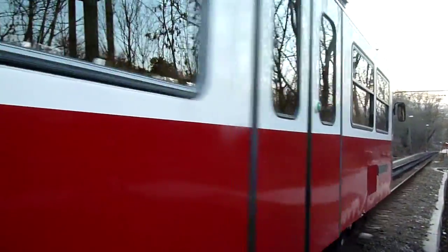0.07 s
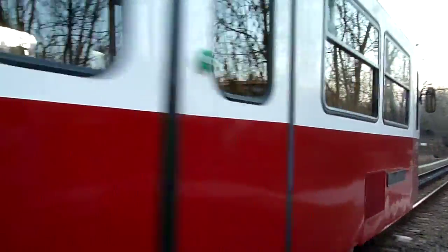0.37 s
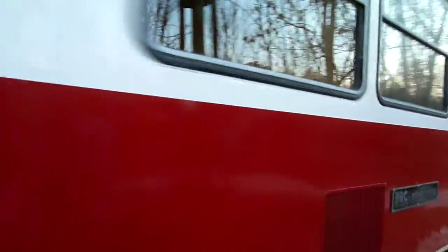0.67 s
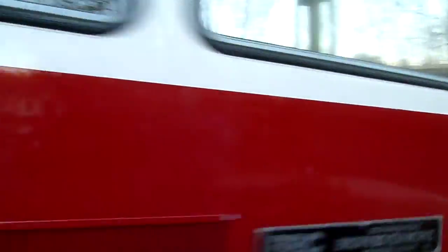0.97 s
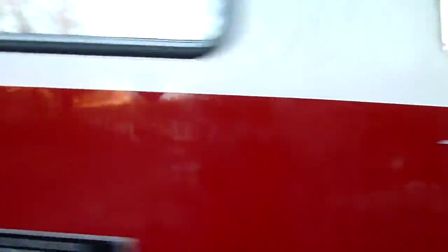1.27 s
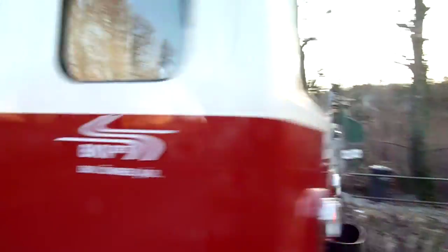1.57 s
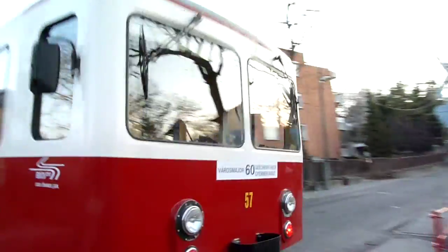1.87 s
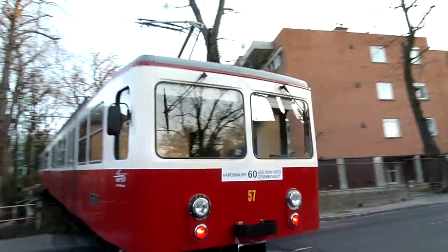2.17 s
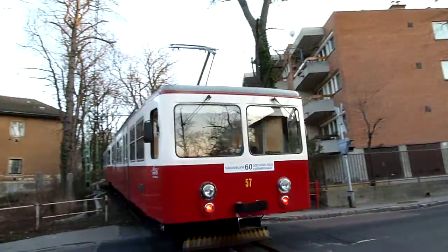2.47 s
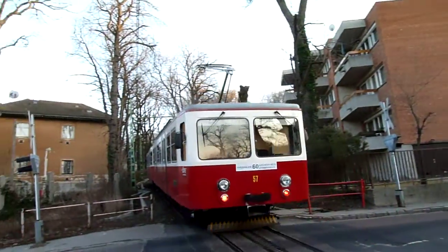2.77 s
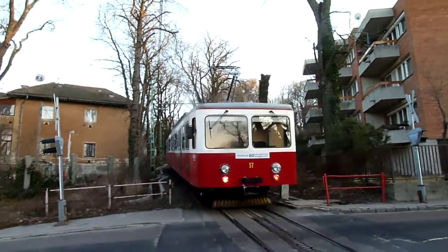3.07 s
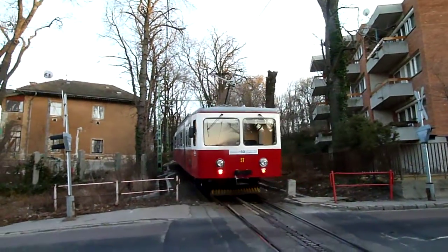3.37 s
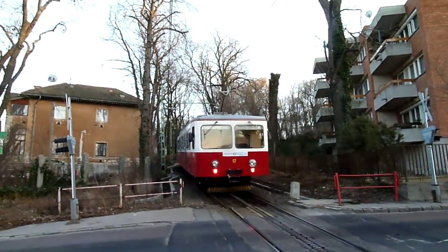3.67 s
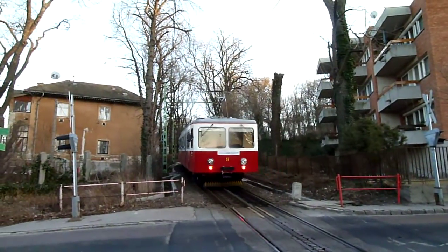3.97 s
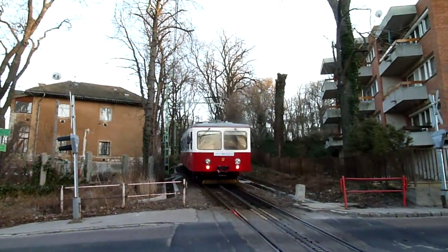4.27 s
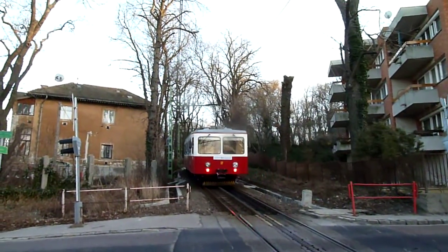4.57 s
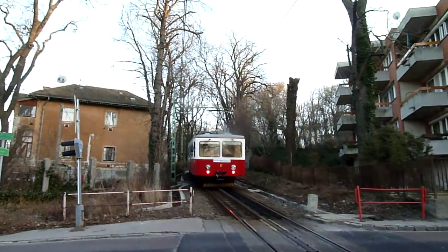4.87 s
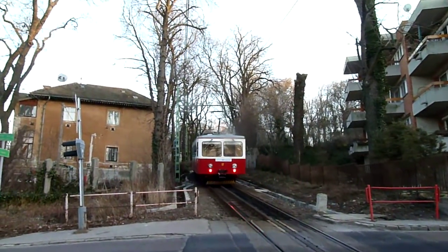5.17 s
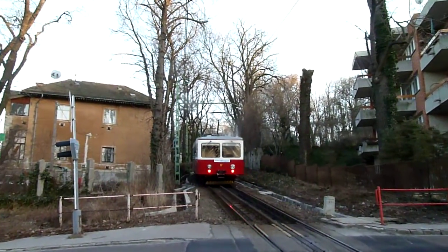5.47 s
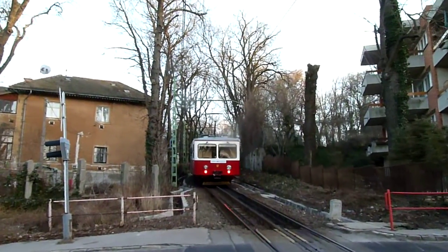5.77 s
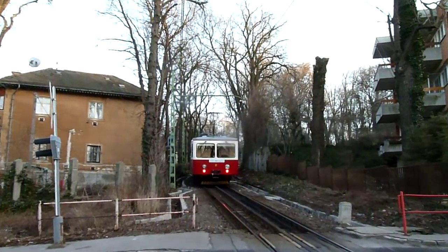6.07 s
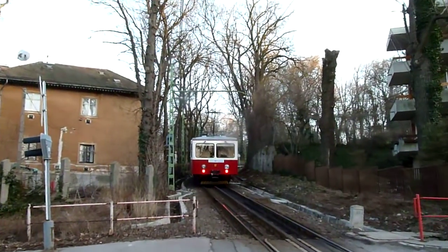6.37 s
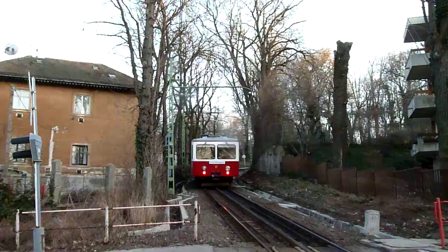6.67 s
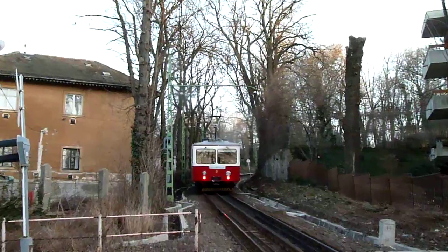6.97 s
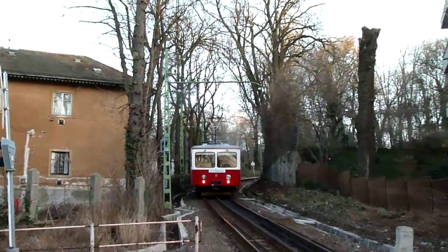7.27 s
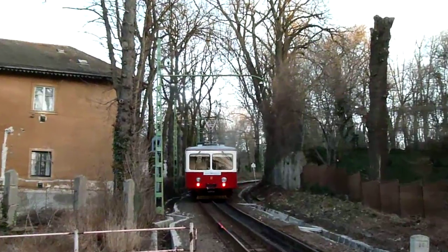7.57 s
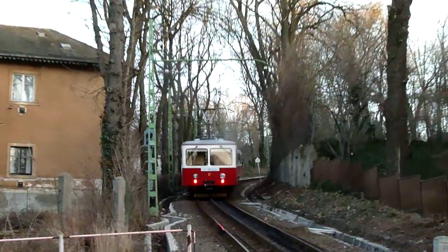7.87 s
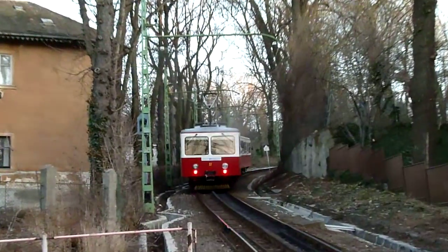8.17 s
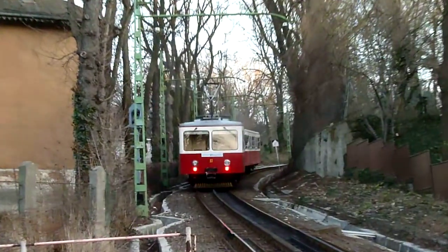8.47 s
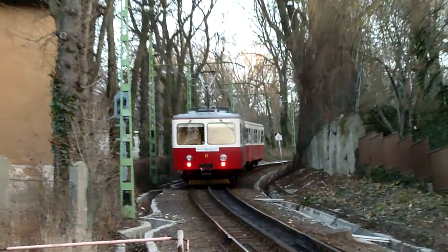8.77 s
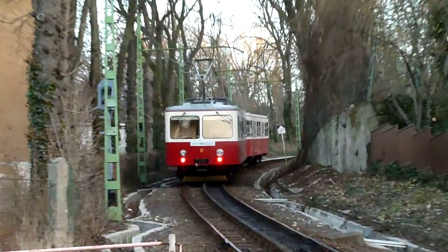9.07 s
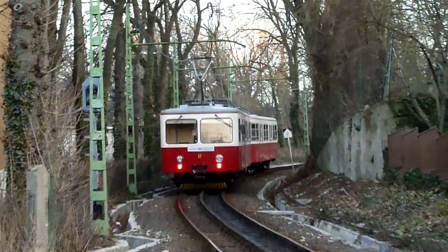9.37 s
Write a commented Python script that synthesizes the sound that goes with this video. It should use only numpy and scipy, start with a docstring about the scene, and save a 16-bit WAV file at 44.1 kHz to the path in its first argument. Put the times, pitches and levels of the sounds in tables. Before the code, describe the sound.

A cog railway car rolls past very close with a roar, steel squeals and knocks, then draws away with a throbbing drone.

```python
"""A broad roar, with steel hissing, squealing and knocking in it: a cog railway car rolls past within
arm's reach, crosses a road and draws away, slowly gaining speed. Friction rings the modes of its wheels,
and blows at the joints ring those of the running gear. The pinions strike the rack periodically and so
sound a harmonic series; further off its third harmonic, lifted by a resonance of the car body, stands
out as a drone."""
import sys
import numpy as np
from scipy import signal
from scipy.fft import rfft, irfft
from scipy.io import wavfile
from scipy.ndimage import uniform_filter1d

SR = 44100
rng = np.random.default_rng(int(sys.argv[2]) if len(sys.argv) > 2 else 0)


def to_wav(sig):
    """Store sig (one row per channel, or 1-D mono) as 16-bit WAV at the path in sys.argv[1].

    Samples outside -1..1 are clipped; the rate is SR.
    """
    pcm = np.clip(np.atleast_2d(sig), -1, 1) * 32767
    pcm = np.round(pcm).astype(np.int16)
    wavfile.write(sys.argv[1], SR, pcm.T)  # frames by channels


N = 420273
T = np.arange(N) / SR

# The rolling level, reference for roar and friction. Each row: time in seconds, level in dB.
ROLLING_LEVEL = [(0.0, -33), (2.02, -34.5), (3.15, -40.5), (3.79, -39), (3.92, -43), (4.91, -41),
                 (6.4, -42.5), (7.45, -36), (7.65, -40), (7.85, -37), (9.53, -36.5)]
# Spectrum of steel rubbing on steel. Each row: frequency in Hz, relative density in dB.
FRICTION_SPECTRUM = [(600, -7.5), (1500, 7), (2600, 5.5), (4000, 4), (5300, -2.5), (6200, -8),
                     (7100, -25.5)]


def amp(db):
    """Amplitude ratio for a level in decibels."""
    return 10 ** (np.asarray(db) / 20)


def unit(x):
    """Normalisation to rms 1."""
    return x / np.sqrt(np.mean(x ** 2) + 1e-20)


def curve(rows):
    """Linear interpolation between rows of time in seconds and value."""
    return np.interp(T, *np.transpose(rows))


def swell(s, length):
    """A raised-cosine window of height 1, centred on time s."""
    return np.cos(np.pi * np.clip((T - s) / length, -.5, .5)) ** 2


def plateau(s, length):
    """A rounded, flat-topped window of height 1, centred on time s."""
    return np.maximum(1 - np.abs(2 * (T - s) / length) ** 3, 0)


def add(mix, s, sound):
    """Superposition: a sound joins the mix at time s."""
    part = mix[max(round(s * SR), 0):][:len(sound)]
    part += sound[:len(part)]


def wander(rate_hz):
    """Low-pass noise of rms 1: a random fluctuation up to about the given rate."""
    knots = rng.standard_normal(2048)
    slow = irfft(rfft(knots) / (1 + (np.fft.rfftfreq(2048, 1 / 200) / rate_hz) ** 4))
    return unit(np.interp(T, np.arange(2048) / 200, slow))


def noise(shape, patchy_db):
    """Spectrally shaped noise of rms 1, with short-lived patches of more and less energy."""
    hz = np.fft.rfftfreq(2048, 1 / SR)
    re, im, patches = rng.standard_normal((3, len(hz), N // 512 + 4))
    patches = unit(uniform_filter1d(uniform_filter1d(patches, size=14, axis=0), size=4, axis=1))
    shape_hz, db = np.transpose(shape)
    colour = amp(np.interp(np.log(hz + 1), np.log(shape_hz), db))[:, None]
    spectra = (re + 1j * im) * colour * amp(patchy_db * patches)
    return unit(signal.istft(spectra, nperseg=2048, noverlap=1536)[1][:N])


def band(x, low_hz, high_hz):
    """A steep band-pass filter."""
    return signal.sosfilt(signal.butter(3, [low_hz, high_hz], "band", fs=SR, output="sos"), x)


def resonate(x, hz, width):
    """Forced response of a damped oscillator of fixed or gliding frequency; width is in Hz."""
    phasor = np.exp(2j * np.pi * np.cumsum(hz * np.ones(len(x))) / SR)
    pole = np.exp(-np.pi * width / SR)
    return 2 * (phasor * signal.lfilter([1 - pole], [1, -pole], x / phasor + 1e-18)).imag


def ring(x, hz, width):
    """Two resonators in cascade give a peak with steep skirts; rms 1."""
    return unit(resonate(resonate(x, hz, 1.2 * width), hz, 1.4 * width))


def held(x):
    """Amplitude limiting: evens out the fading of a mode, as steady friction does."""
    return x / np.sqrt(uniform_filter1d(x ** 2, size=SR // 40) + .1)


def dulled(x, away):
    """Absorption over distance takes off some of the top treble."""
    return x + 0.22 * away * (uniform_filter1d(x, size=5) - x)


def wheel_mode(hz, width):
    """A noise-driven mode, Doppler-shifted upward until the wheels have gone by."""
    pass_s, pass_length_s, shift = 1.3, .12, .015
    doppler = 1 + shift * (1 - np.tanh((T - pass_s) / pass_length_s)) / 2
    return ring(rng.standard_normal(N), hz * doppler, width)


def mesh_cycles():
    """Phase is the integral of frequency: the count of teeth passed, as the drive hunts a little."""
    # Each row: time in seconds, teeth meeting the rack per second.
    tooth_rate = [(0, 55.0), (2, 57.5), (3, 59.6), (4, 61.0), (5, 62.2), (7.5, 64.1), (9.53, 64.3)]
    return np.cumsum(curve(tooth_rate) * (1 + 0.0053 * wander(rate_hz=3.18))) / SR


def tooth_pulse(cycles):
    """Amplitude modulation by the load: one swell a tooth, no two equally hard; rms 1."""
    return unit((.35 + np.cos(np.pi * cycles) ** 2) * amp(.8 * wander(rate_hz=40)))


def scraping():
    """Friction grows with contact force: its rise in dB while a bogie leans on the rail."""
    # Each row: middle in seconds, length in seconds, rise in dB.
    scrapes = [(0.65, 0.12, 0.5), (2.794, 0.29, 7.5), (3.69, 0.74, 4.5), (4.553, 0.32, 8), (4.94, 0.91, 7),
               (5.404, 0.94, 6), (6.837, .22, 3.5), (7.32, 0.55, 0), (9.1, 1, 4)]
    return sum(db * swell(s, length) for s, length, db in scrapes)


def pinions_in_step():
    """Constructive interference: an envelope that rises where the pinions fall into step."""
    # Each row: middle in seconds, length in seconds.
    swells = [(3.62, 0.3), (4.184, 0.12), (4.405, 0.21), (4.537, 0.18), (4.773, 0.19), (5.19, 0.47),
              (5.718, 0.27), (5.993, 0.27), (6.292, 0.42), (6.62, 0.2), (7.13, 0.39)]
    return sum(plateau(s, length) for s, length in swells)


def rumble(scrape_db, in_step):
    """Forced vibration of car body and track bed, growing with scrapes and heaving with the drone."""
    # Each row: time in seconds, base level in dB.
    body_level = [(0, -34.5), (2.6, -38.5), (3.6, -35.5), (4.7, -34.5), (6.2, -43.5), (7.4, -30.5),
                  (8.5, -39), (9.53, -40)]
    # Each row: frequency in Hz, relative density in dB.
    body_spectrum = [(15, -28.5), (25, -10.5), (38, 8.5), (65, 0.5), (85, 8.5), (130, 4.5), (220, 11),
                     (330, -16.5), (600, -53)]
    level_db = curve(body_level) + 0.22 * scrape_db + 3 * (in_step - .5) + wander(rate_hz=1.9)
    return amp(level_db) * noise(body_spectrum, patchy_db=1.0)


def flange_hiss():
    """Sliding friction: in the bend the flanges lean on the rail and give a coarse band of noise."""
    # Each row: time in seconds, level in dB.
    grinding_level = [(6.6, -64.5), (7.7, -57), (7.95, -45.5), (8.9, -49), (9.53, -50.5)]
    return amp(curve(grinding_level)) * unit(band(rng.standard_normal(N), low_hz=2230, high_hz=3550))


def snap():
    """A short impulse has a wide spectrum: a dry, bright click close by, with one quick rebound."""
    # Each row: start in seconds, peak level in dB.
    clicks = [(3.931, -11)]
    decay_s, rebound_s = 0.00014, 0.0021
    out, t = np.zeros(N), np.arange(SR // 100) / SR
    crack = band(np.exp(-t / decay_s) * np.sin(2 * np.pi * 4200 * t), low_hz=2470, high_hz=7060)
    crack /= np.abs(crack).max()
    for s, db in clicks:
        add(out, s, amp(db) * crack)
        add(out, s + rebound_s, amp(db) * crack)
    return out


def knocks():
    """Impact excitation: a push and a brief rattle set the modes of the bogie ringing in a round clunk."""
    # Each row: start in seconds, nominal level in dB, decay of the rattle in seconds, pitch factor.
    blows = [(0.604, -23, 0.05, 0.83), (0.853, -20.5, 0.015, 0.66), (1.345, -22, 0.016, 0.53),
             (1.598, -12.5, 0.0082, 1.02), (2.312, -12, 0.018, 1.08), (2.338, -20, 0.01, 1.04),
             (3.029, -17.5, 0.0074, 1.06), (4.669, -23, 0.0047, 1.09), (4.985, -17, 0.0029, 1.1)]
    # Each row: frequency in Hz, base bandwidth in Hz, relative level in dB.
    bogie_modes = [(283, 25, -2.5), (382, 37, -0.5), (479, 23, -4), (562, 16, -1), (657, 32, -4),
                   (780, 41, -21), (960, 290, -6.5)]
    out, t = np.zeros(N), np.arange(SR // 4) / SR
    for s, db, decay, pitch in blows:
        drive = rng.standard_normal(len(t)) * np.exp(-t / decay)
        drive[0] += .3 * np.linalg.norm(drive)  # the push
        damping = 1 + 0.0047 / decay  # short blows are the well damped ones
        clunk = sum(amp(mode_db) * unit(resonate(drive, hz * pitch, width * damping))
                    for hz, width, mode_db in bogie_modes)
        clunk = band(clunk, low_hz=250, high_hz=1100) * (1 - np.exp(-t / .002))
        add(out, s, amp(db) * unit(clunk) * np.sqrt(decay / t[-1]))
    return out


def clashes():
    """Hard contact excites high frequencies: flanges and teeth strike steel, and one wheel mode rings."""
    # Each row: start in seconds, level in dB before the envelope, decay in seconds,
    # mode frequency in Hz, mode level in dB relative to the burst.
    strikes = [(0.2, -26, 0.049, 4020, -12), (0.842, -20.5, 0.023, 5110, -15),
               (1.335, -35.5, 0.03, 1884, 11.5), (1.716, -27.5, 0.037, 2344, 4.5),
               (2.326, -27, 0.042, 3540, -5), (2.471, -28.5, 0.015, 3350, -6),
               (3.783, -27, 0.015, 3000, -19), (5.012, -24.5, 0.029, 3490, -4),
               (5.303, -27, 0.024, 3490, -3), (7.474, -35.5, 0.037, 3590, 3),
               (9.133, -23.5, 0.038, 3550, -1.5)]
    out, t = np.zeros(N), np.arange(SR // 3) / SR
    bright = unit(signal.lfilter([1, -.4], 1, noise(FRICTION_SPECTRUM, patchy_db=2)))
    grit = bright * unit(amp(3.2 * wander(rate_hz=70)))
    for s, db, decay, hz, ring_db in strikes:
        envelope = np.exp(-t / decay) * (1 - np.exp(-t / (.7 * decay)))
        burst = grit[round(s * SR):][:len(t)] * envelope
        chime = ring(burst, hz, width=70) * np.std(burst)
        add(out, s, amp(db) * (burst + amp(ring_db) * chime))
    return out


def squeals(scrape_db, away):
    """Stick-slip: two wheel modes sing thinly, flutter as one and flare where a flange catches."""
    # Each row: middle in seconds, length in seconds, levels of the lower and upper mode in dB.
    flares = [(0.358, 0.12, -46, -44.5), (0.82, 0.37, -39.5, -50), (1.11, 0.26, -35.5, -43),
              (1.384, 0.1, -36, -42), (1.535, 0.21, -31.5, -46), (1.85, 0.21, -39.5, -48),
              (2.11, 0.28, -40.5, -41.5), (2.6, 0.77, -49.5, -52), (3.85, 1, -59, -52),
              (5.2, 0.091, -59, -42), (6.8, 0.52, -50, -54), (7.36, 0.54, -45, -48),
              (9.203, 0.25, -37, -48)]
    # Each row: time in seconds, frequency of the upper mode in Hz before the Doppler shift.
    upper_pitch = [(5.3, 3570), (6.7, 3530)]
    # Higher modes, heard close by. Each row: frequency in Hz, level in dB relative to the upper mode.
    overtones = [(4340, -18), (5040, -17), (5440, -17.5)]
    lower_hz, width_hz = 2334, 56
    lower_db, upper_db = -14.5, -19.5  # steady singing, relative to the friction
    low = held(wheel_mode(lower_hz, width_hz))
    high = held(wheel_mode(curve(upper_pitch), width_hz))
    high += (1 - away) * sum(amp(db) * wheel_mode(hz, width_hz) for hz, db in overtones)
    flutter = unit(amp(3 * (wander(rate_hz=45) + .5 * wander(rate_hz=12))))
    low_flare = sum(amp(db) * plateau(s, length) for s, length, db, _ in flares)
    high_flare = sum(amp(db) * plateau(s, length) for s, length, _, db in flares)
    friction = amp(curve(ROLLING_LEVEL) + scrape_db)
    low *= np.hypot(amp(lower_db) * friction, low_flare)
    high *= np.hypot(amp(upper_db) * friction, high_flare)
    return flutter * (low + high)


def wheel_rubbing(scrape_db):
    """Friction is a broadband force: the steel hisses and its damped modes ring, surging in scrapes."""
    # Each row: frequency in Hz, bandwidth in Hz, relative level in dB.
    damped_modes = [(1286, 110, 1), (2545, 270, -1.5), (4890, 200, -12)]
    hiss = noise(FRICTION_SPECTRUM, patchy_db=2.0) * unit(amp(0.79 * wander(rate_hz=57)))
    ringing = sum(amp(db + 2 * wander(rate_hz=17)) * wheel_mode(hz, width)
                  for hz, width, db in damped_modes)
    return amp(curve(ROLLING_LEVEL) - 16.5 + scrape_db) * (amp(8.0) * hiss + ringing)


def groans(cycles):
    """Source and filter: the pinion binds, and its teeth grind and rasp into a gliding resonance."""
    # Each row: start and length in seconds, first and last frequency in Hz, level in dB, bandwidth in Hz.
    glides = [(0.447, 0.35, 517, 725, -27.5, 150), (1.07, 0.42, 400, 300, -25, 150),
              (1.42, 0.48, 305, 276, -30, 80), (1.994, .39, 300, 740, -23.5, 240),
              (1.98, 0.88, 405, 450, -32, 110), (2.4, 0.15, 497, 540, -33, 200),
              (3.383, 0.15, 700, 534, -28.5, 150)]
    rasp_share, smear_rad = 0.34, .17  # the smear spreads each tooth's blow in time
    out = np.zeros(N)
    teeth = unit(sum(np.cos(2 * np.pi * k * cycles - smear_rad * k ** 2) for k in range(1, 20)))
    rasp = tooth_pulse(cycles) * unit(band(rng.standard_normal(N), low_hz=100, high_hz=1200))
    drive = (1 - rasp_share) * teeth + rasp_share * rasp
    for s, length, start_hz, end_hz, db, width in glides:
        count = int(length * SR)
        voice = ring(drive[round(s * SR):][:count], np.linspace(start_hz, end_hz, count), width)
        add(out, s, amp(db) * voice * signal.windows.tukey(count, .7))
    return out


def rack(cycles, away):
    """Periodic tooth blows give a harmonic series; several pinions beat, so each line swells and fades."""
    # Each row: multiple of the tooth rate, level close by in dB, level from afar in dB.
    harmonics = [(1, -44.5, -40.5), (2, -42.5, -40.5), (3, -36, -41.5), (4, -34, -41), (5, -36, -43),
                 (6, -43.5, -47), (7, -30, -56), (8, -32.5, -61.5), (9, -46, -47.5), (10, -45.5, -48)]
    out = np.zeros(N)
    for order, near_db, far_db in harmonics:
        beating = 0.27 + .5 * (wander(rate_hz=11.3) + 1j * wander(rate_hz=4.2))
        line = (beating * np.exp(2j * np.pi * (order * cycles + rng.random()))).real
        out += amp(near_db + (far_db - near_db) * away) * unit(line)
    return out


def drone(cycles, in_step):
    """Resonance: as speed builds, the third tooth harmonic meets a mode of the car body, which booms."""
    # Each row: time in seconds, level in dB before the swells and the fade-in.
    base_level = [(2.9, -31), (4.0, -31), (4.5, -32), (6.2, -31.5), (6.9, -34.5), (7.3, -29), (8.05, -33),
                  (8.45, -22.5), (9.2, -20.5), (9.53, -23.5)]
    unrest = curve([(8.2, 1), (8.47, 0.16)])  # the throb steadies in the bend
    phase = 2 * np.pi * 3 * cycles + .8 * unrest * wander(rate_hz=7)
    tone = unit(np.sin(phase) * (1 + 0.13 * wander(rate_hz=31)))
    shake = rng.standard_normal(N) * tooth_pulse(cycles) ** 2
    boom = unit(unit(band(shake, low_hz=149, high_hz=298)) + 0.48 * ring(shake, hz=291.3, width=46))
    surge_db = 14 * plateau(s=3.79, length=0.11)  # one boom as the car leaves the crossing
    rise_db = 8 * in_step + surge_db
    throb = 1 + 0.38 * unrest * np.tanh(2 * wander(rate_hz=13))  # the pinions beat against each other
    body = throb * (amp(rise_db) * tone + amp(-3.5 + .7 * rise_db) * np.sqrt(unrest) * boom)
    fade_in = curve([(2.6, 0.12), (3.1, 0.61)])
    return amp(curve(base_level)) * body * fade_in


def rolling_roar(cycles, away, scrape_db):
    """Broadband noise of wheels and gears, modulated by the teeth; from afar track modes colour it."""
    # The roar close by and from afar. Each row: frequency in Hz, relative density in dB.
    near_spectrum = [(120, -28.5), (220, 3.5), (310, 3.5), (450, -1), (700, -1), (1200, -7), (2000, -14.5),
                     (3000, -35), (5000, -47.5), (7000, -53.5)]
    far_spectrum = [(35, -14), (120, 2), (250, 0.5), (320, -4), (430, -3.5), (600, -1), (850, -6),
                    (1300, -7), (2000, -13), (2700, -15), (4000, -25), (7000, -47)]
    # Resonances of rail and rack that carry far. Each row: frequency in Hz, relative level in dB.
    track_modes = [(525, -16), (670, -14.5), (815, -12.5), (985, -12.5), (1088, -17.5), (1325, -13.5)]
    near = amp(10) * noise(near_spectrum, patchy_db=2.0)
    track = sum(amp(db) * ring(rng.standard_normal(N), hz, width=20) for hz, db in track_modes)
    far = amp(6) * (noise(far_spectrum, patchy_db=1.0) + amp(-3.5) * track)
    pulsing = unit(1 + 0.029 * np.cos(2 * np.pi * cycles) + 0.014 * wander(rate_hz=21))
    roar = np.sqrt(1 - away) * near + np.sqrt(away) * far
    return amp(curve(ROLLING_LEVEL) + 0.097 * scrape_db) * pulsing * roar


def scene():
    """Superposition of all the sounds of the car, in one channel."""
    # Each row: time in seconds, share of the sound heard from afar, from 0 to 1.
    far_share = [(0, 0.1), (2.6, 0.26), (3.4, 0.45), (4.2, 0.84), (6.3, 0.97)]
    cycles, away = mesh_cycles(), curve(far_share)
    scrape_db, in_step = scraping(), pinions_in_step()
    gearing = rack(cycles, away) + drone(cycles, in_step) + groans(cycles)
    running = rolling_roar(cycles, away, scrape_db) + rumble(scrape_db, in_step)
    flanges = flange_hiss() + squeals(scrape_db, away)
    steel = dulled(wheel_rubbing(scrape_db) + clashes(), away)
    return (gearing + running + flanges + steel + knocks() + snap())[None]


def record(dry):
    """Band limiting: a small microphone passes neither the deepest bass nor the top treble."""
    low_hz, high_hz = 27, 7350
    thin = signal.sosfilt(signal.butter(4, low_hz, "high", fs=SR, output="sos"), dry)
    low_pass = signal.firwin(255, high_hz, window=("kaiser", 9), fs=SR)
    return signal.oaconvolve(thin, low_pass[None], "same")


dry = scene()
out = record(dry)
to_wav(out)
```